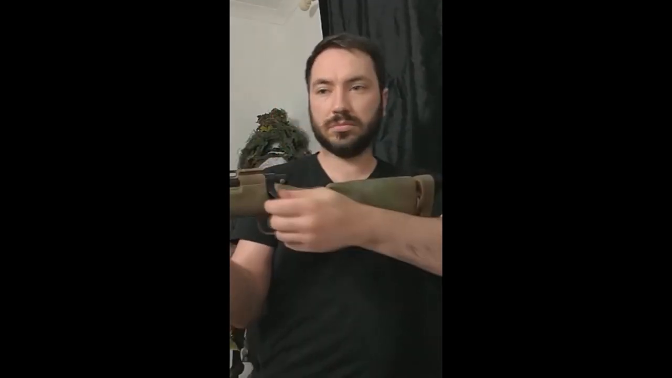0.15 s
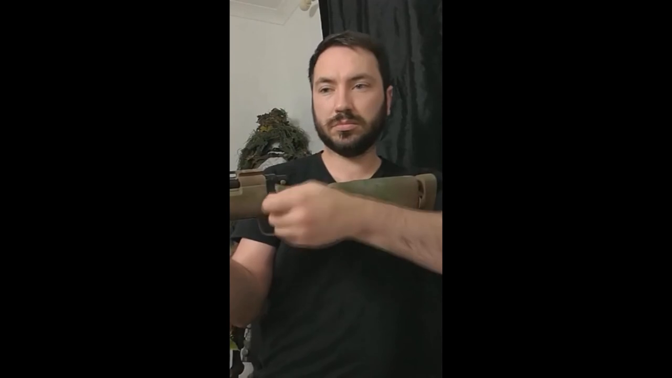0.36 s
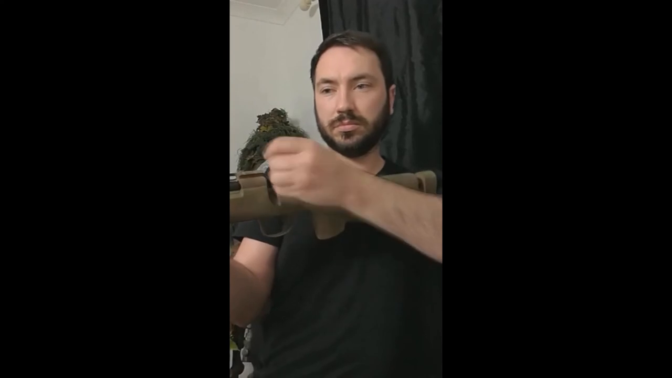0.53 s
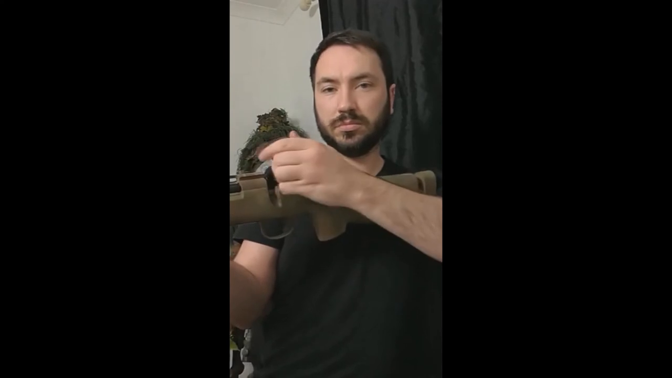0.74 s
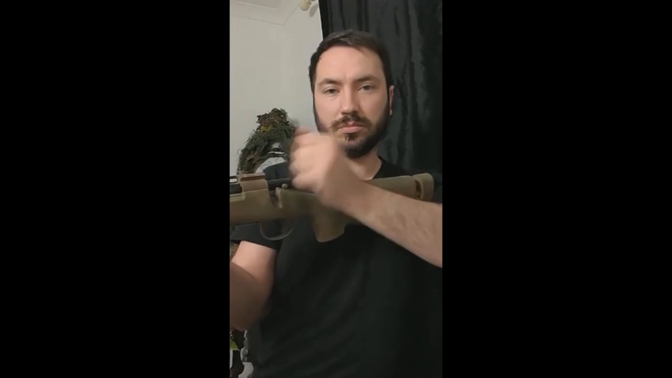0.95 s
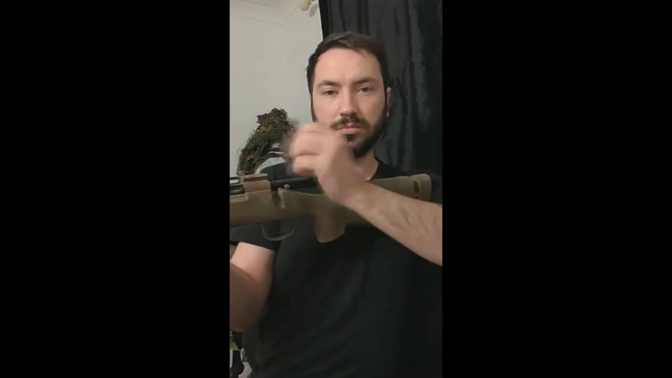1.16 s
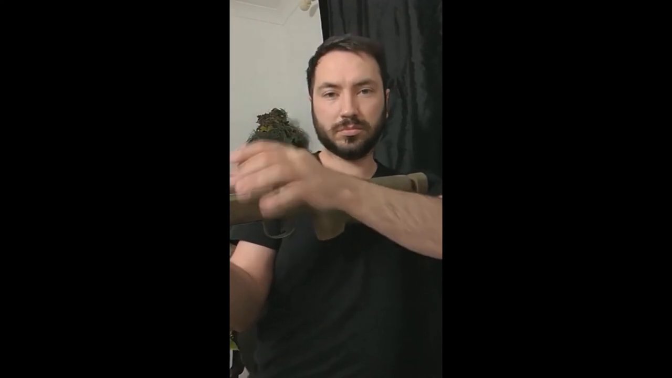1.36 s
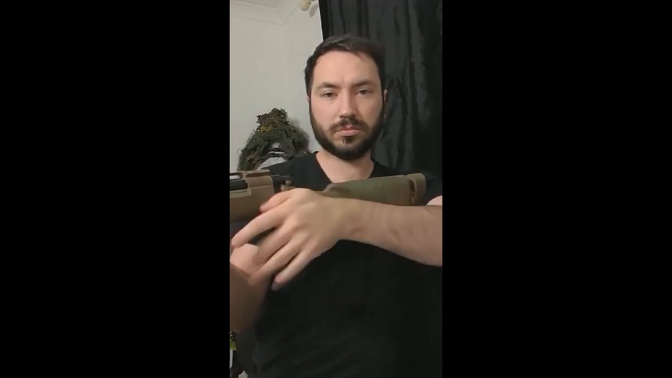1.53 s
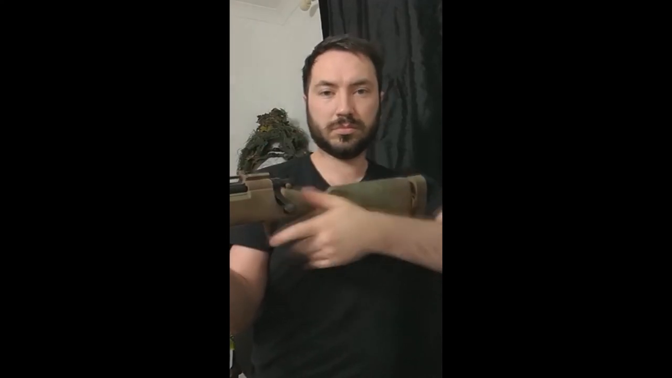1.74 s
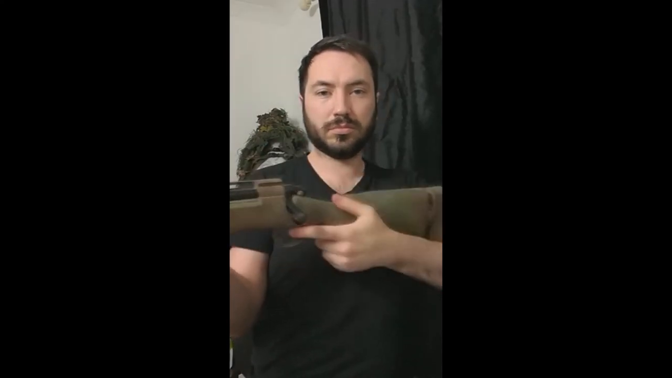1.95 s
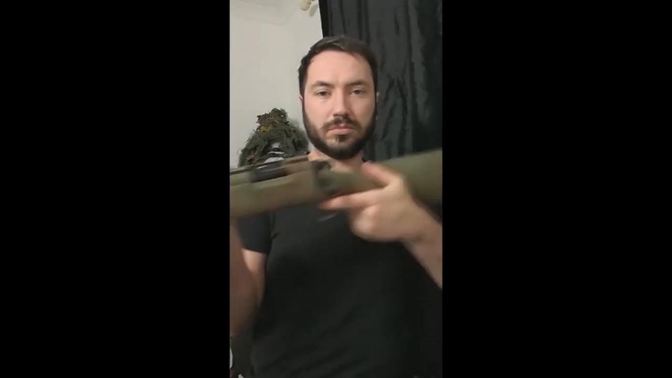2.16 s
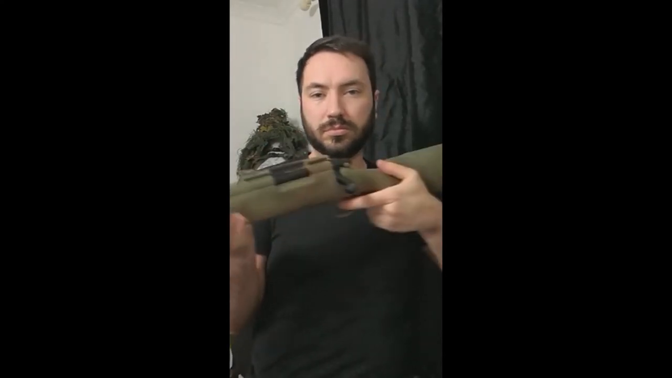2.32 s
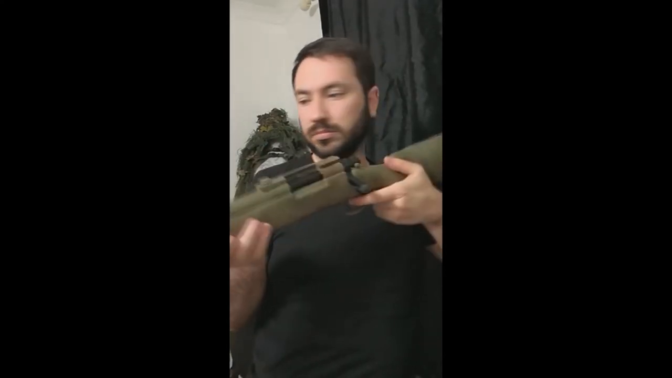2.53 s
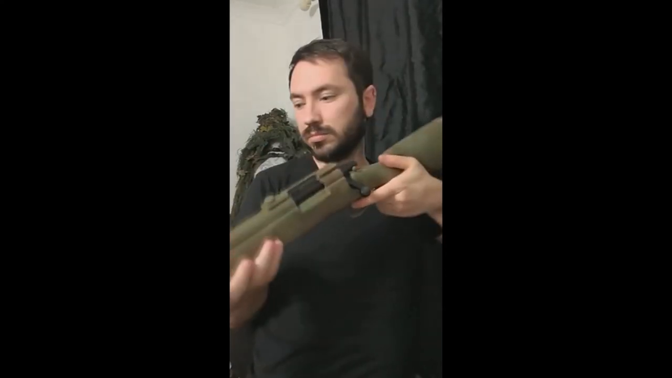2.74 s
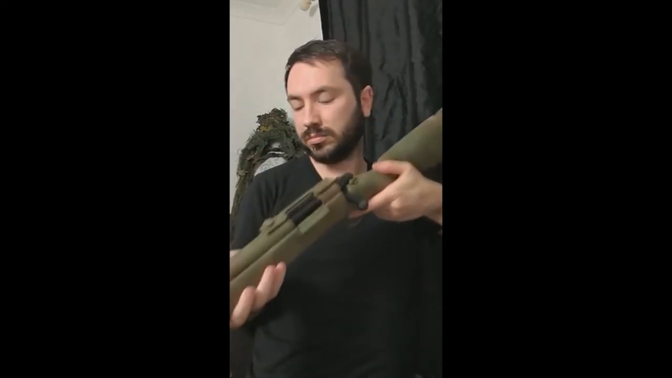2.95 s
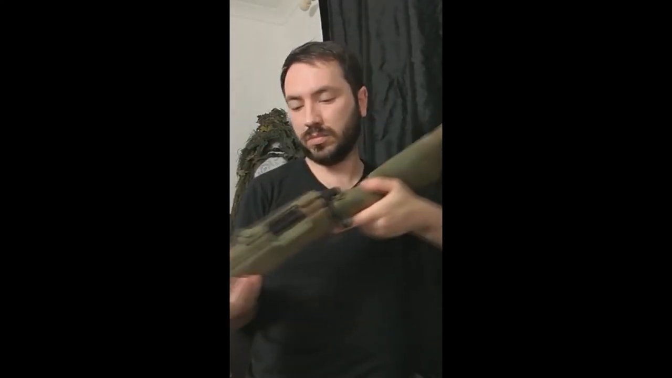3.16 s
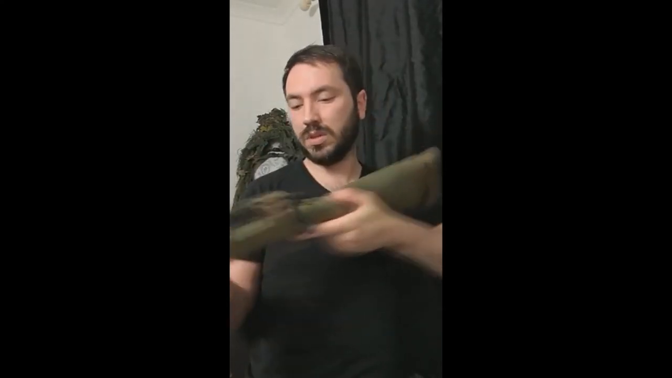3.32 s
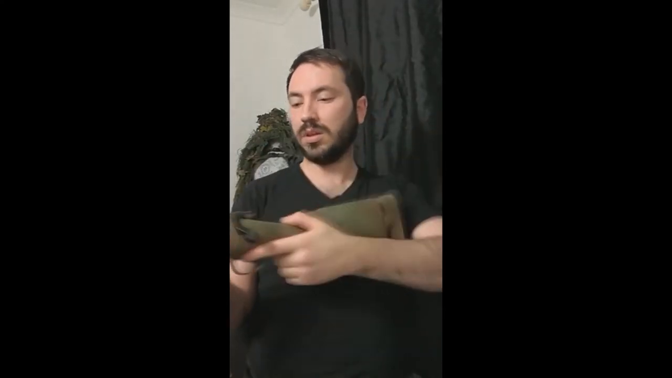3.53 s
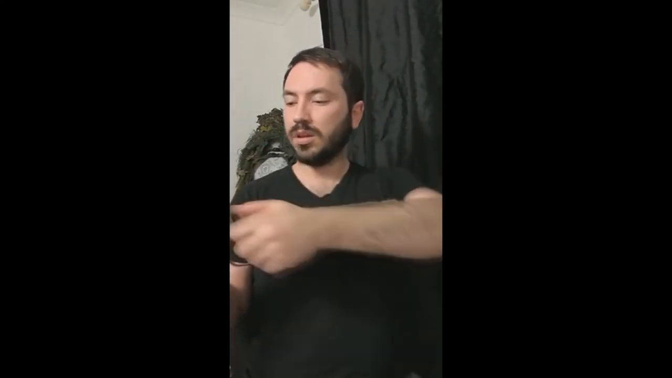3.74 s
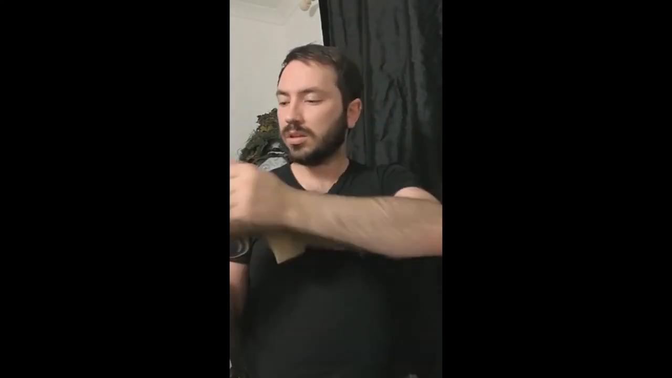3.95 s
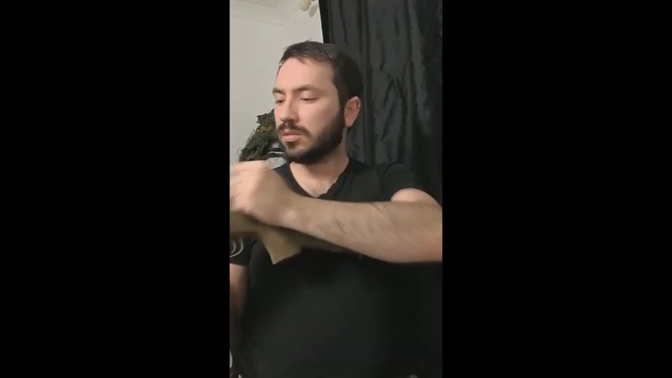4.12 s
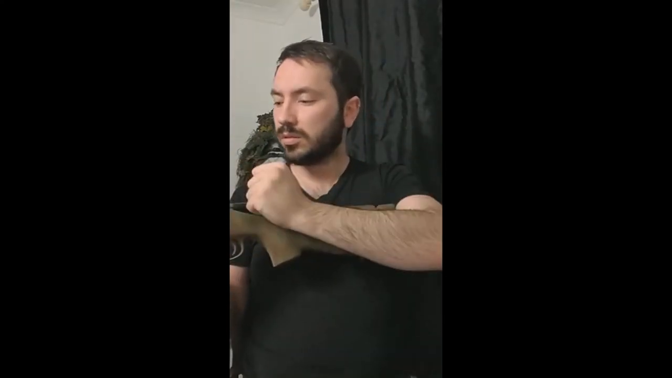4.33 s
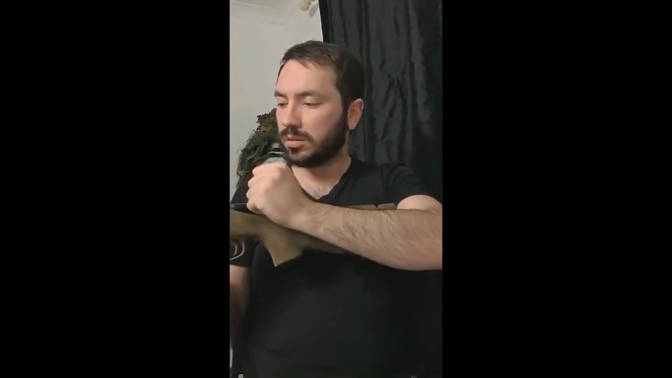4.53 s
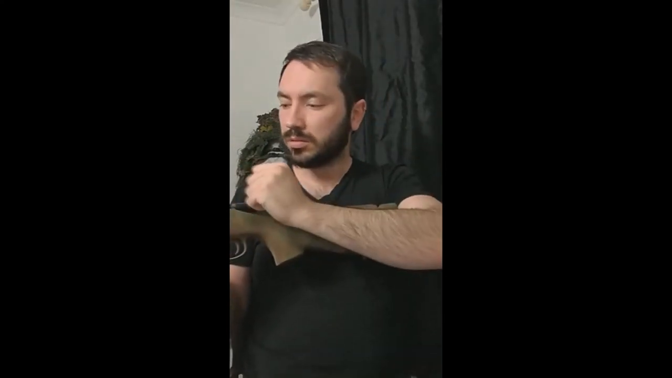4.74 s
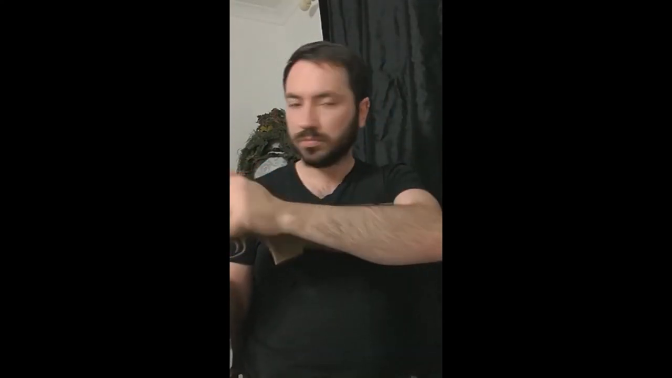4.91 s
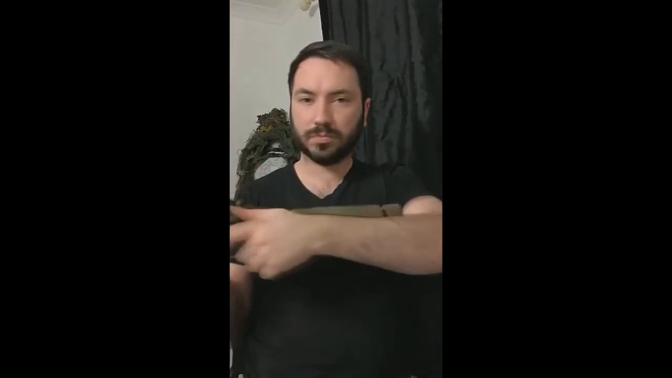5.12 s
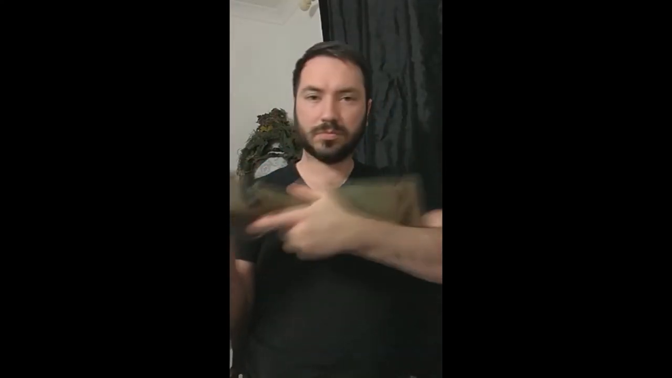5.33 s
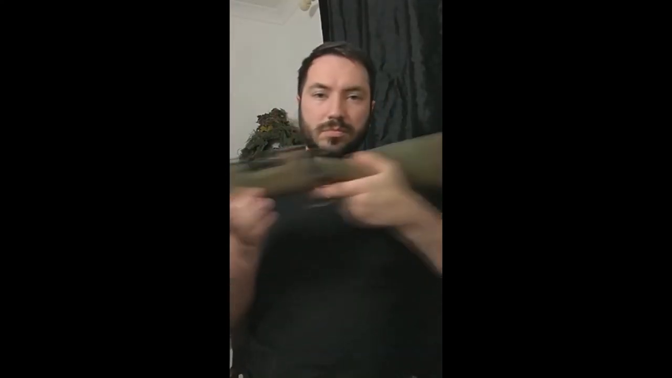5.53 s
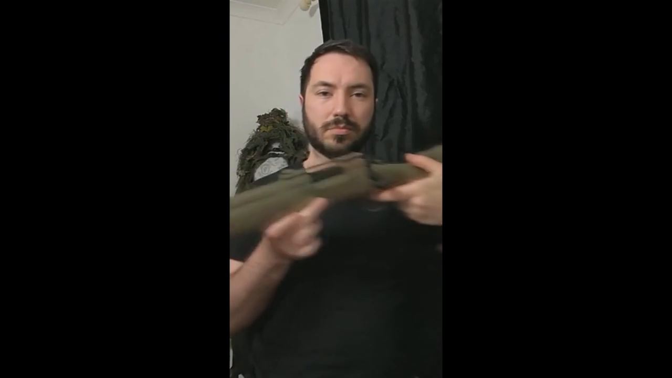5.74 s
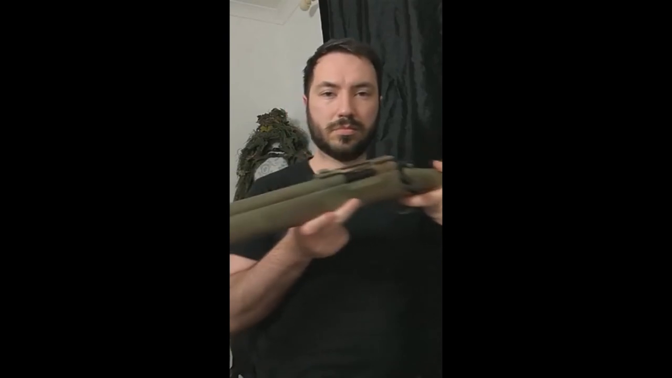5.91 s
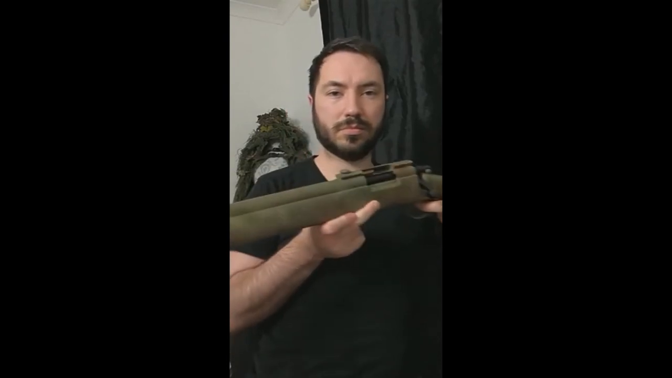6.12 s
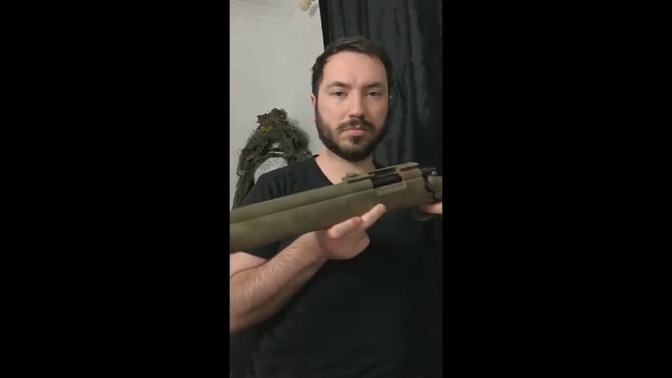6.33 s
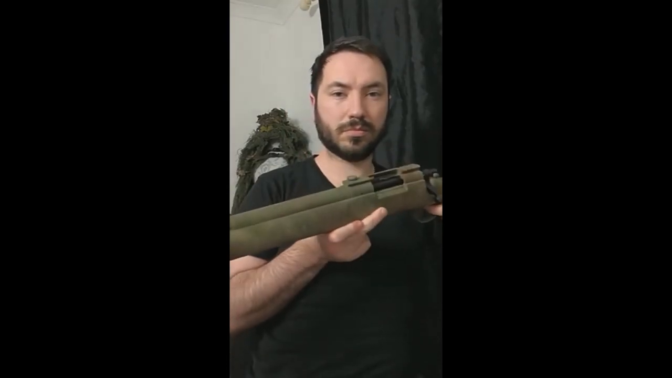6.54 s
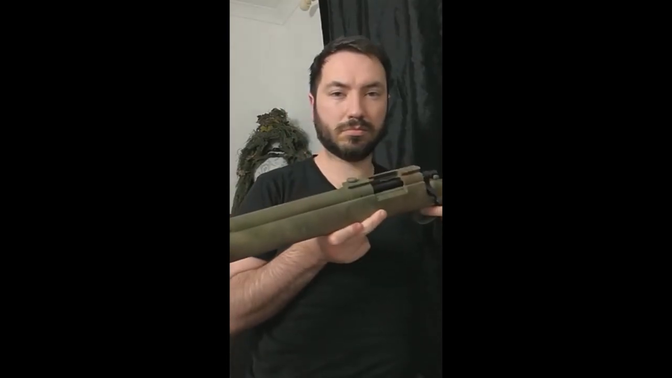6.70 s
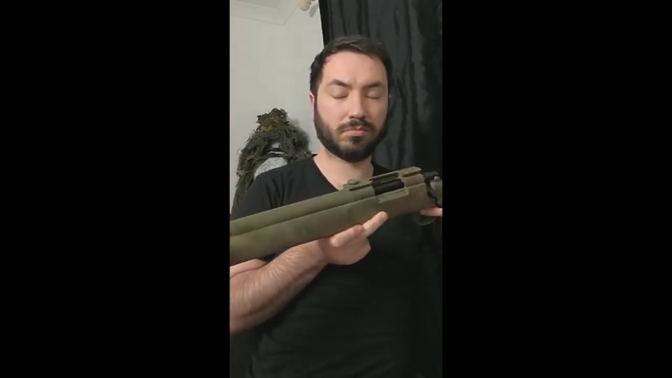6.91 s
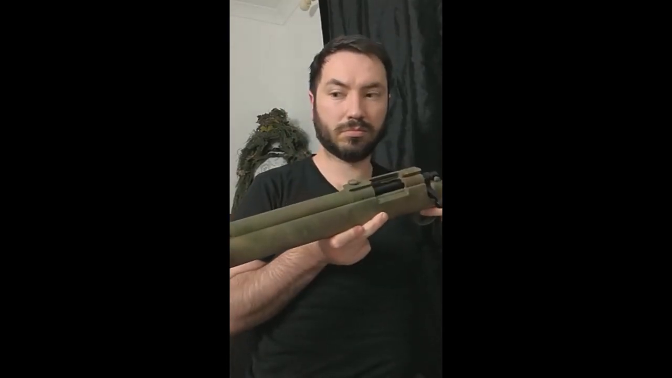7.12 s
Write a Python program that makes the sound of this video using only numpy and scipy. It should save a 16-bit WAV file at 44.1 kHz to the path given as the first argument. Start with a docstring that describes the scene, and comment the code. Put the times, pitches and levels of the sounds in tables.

```python
"""Air rifle, cocked and fired

A spring air rifle is handled in a small furnished room, close to a phone microphone. Its bolt is lifted,
drawn, pushed home and locked twice: noise chatter and sliding grit drive the ringing modes of metal and stock.
Hands and sleeves rub the plastic in swells of grainy noise, over low rumble, room tone and a thin whine.
At the end it fires: a piston slam through resonances, a burst of shaped noise for the air, a late clatter."""
import sys
import numpy as np
from scipy import signal
from scipy.fft import rfft, irfft, next_fast_len
from scipy.io import wavfile

SR = 44100
rng = np.random.default_rng(int(sys.argv[2]) if len(sys.argv) > 2 else 0)


def waveform_to_disk(signal):
    """Save audio, clipped to [-1, 1], as 16-bit WAV at the path in sys.argv[1]."""
    frames = np.transpose(np.atleast_2d(signal))
    scaled = np.clip(frames, -1, 1) * 32767
    samples = np.round(scaled).astype(np.int16)
    wavfile.write(sys.argv[1], SR, samples)


N = 316197   # length in samples

# All levels are relative: layer trims, the room and the microphone chain follow.
# steady room tone, spectrum: f/Hz, level/dB
AIR_SPECTRUM = [(12, -38), (20, -14.5), (93, -11.5), (386, 1), (443, -11), (508, 0.5), (599, -10.5),
                (706, -1), (850, -4.5), (1160, -12.5), (1520, -15.5), (5360, -19.5), (9000, -18.5),
                (14000, -21)]
AIR_DB = -63.5
WHINE_HZ, WHINE_DB = 8280, -73.5   # a thin steady electrical whine

# hands and sleeves on the stock, one swell a row:
# peak t/s, rise t/s, fall t/s, palm drag level/dB, hollow ring level/dB, scuff level/dB, sleeve rustle level/dB
HAND_SWELLS = [(0.0,.05,0.39,-63,-79,-84,-65.5), (.27,0.045,.1,-49,-59,-80,-80),
               (.46,0.26,0.18,-61,-84,-94,-93), (.79,0.04,0.095,-57,-79,-82,-70),
               (.966,0.01,0.17,-61.5,-56.5,-78,-77), (1.754,0.054,0.09,-67,-83,-72,-52.5),
               (1.938,0.33,0.088,-62.5,-61.5,-60,-55), (2.142,0.052,0.11,-71,-56,-62.5,-59.5),
               (2.22,.1,0.17,-70,-54,-63.5,-60.5), (2.535,0.033,0.1,-66,-63,-59,-75),
               (3.184,0.066,.08,-77,-78,-68,-71), (3.446,0.11,0.16,-51.5,-46.5,-60,-57),
               (3.51,0.16,0.19,-58,-57,-50.5,-45), (3.72,0.24,0.49,-54,-79,-58.5,-60),
               (3.914,0.025,0.078,-53,-78,-76,-78), (5.22,0.046,0.059,-66,-45,-64.5,-65),
               (5.342,0.42,.12,-68,-87,-62,-56.5), (5.452,0.058,0.13,-58,-63,-66,-70),
               (5.49,.06,0.13,-66,-70,-62,-61), (5.81,.18,0.1,-62,-60.5,-69,-62),
               (5.88,0.09,0.12,-52.5,-56.5,-56,-56.5), (5.958,.03,.12,-53,-53.5,-60,-62),
               (6.15,.08,0.048,-65,-86,-87,-79), (6.2,0.042,0.057,-64,-70,-87,-77),
               (6.917,.008,0.17,-38,-39.5,-69,-58), (6.937,0.029,0.11,-47,-48,-51.5,-44)]
# palm drag on plastic, then scuff and sleeve cloth (each its own band of it), spectra: f/Hz, level/dB
RUB_SPECTRUM = [(110, -41), (180, -9.5), (259, -1), (527, -1.5), (618, -8.5), (758, -7), (963, -15.5),
                (1500, -14), (1950, -41.5), (3300, -120)]
RUSTLE_SPECTRUM = [(1290, -18.5), (2200, -19), (2530, -1.5), (3900, -1.5), (5440, -5.5), (6110, -2),
                   (10500, -1), (14000, -4.5)]
# long ring of the hollow stock, then its upper rings: f/Hz, width f/Hz, level/dB
HOLLOW_MODES = [(770, 39, 2.5)]
STOCK_MODES = [(1815, 200, 9.5), (2050, 130, 1)]
RING_DB = -3   # upper stock rings re the geometric mean of drag and scuff
SWELL_DB = 28.5   # drop of a swell one rise before its peak or one fall after it

# low rumble that comes with shifts of weight and hard blows:
# peak t/s, rise t/s, fall t/s, hum level/dB, deep level/dB
RUMBLE_SWELLS = [(.3, 0.072, 0.34, -56, -72), (.42, .25, 0.88, -63, -63.5), (.68, 0.33, 0.099, -61, -67),
                 (.84, 0.088, 0.034, -53, -71), (.95, 0.044, 0.033, -58, -67),
                 (1.09, 0.36, 0.28, -73.5, -76), (1.45, 0.17, 0.28, -59, -65),
                 (1.63, .15, 0.21, -55, -60.5), (2.2, 0.21, 0.43, -91, -75), (3.66, 0.12, 0.43, -69, -69),
                 (4.0, 0.16, 0.078, -62, -62), (4.09, .06, 0.18, -53.5, -69),
                 (4.27, .25, 0.049, -57, -84.5), (4.97, 0.11, .3, -59.5, -64), (5.15, 0.2, .13, -52, -64),
                 (5.63, 0.26, .08, -76, -79), (5.88, 0.17, .3, -73, -98), (6.565, 0.0077, 0.25, -32, -35),
                 (6.622, 0.034, 0.074, -36.5, -28), (6.712, .1, 0.059, -39, -55),
                 (6.942, 0.06, 0.19, -47.5, -67.5)]
RUMBLE_HZ, RUMBLE_WIDTH_HZ = 144.2, 33   # each of two resonances in series
HUM_REST_DB, DEEP_REST_DB = -79.5, -80.5

# bolt and catch contacts:
# t/s, peak level/dB, heaviness level/dB, sharpness level/dB, pitch the struck spot favours f/Hz, ring level/dB
CONTACTS = [(.262,-58,3,-7,1270,4), (.527,-23.5,5,5.5,2050,7), (.557,-17,0.5,-3.5,565,18),
            (.599,-29,6,0,565,6), (.624,-17,8.5,-1,565,-5), (.65,-18,9.5,1.5,565,13),
            (.657,-7,0,-0.5,1890,5), (.969,-44,-8,-6,1780,5.5), (1.035,-14.5,-12,14,6400,8.5),
            (1.042,-17.5,1,-4,2050,8), (1.066,-0.5,-14,5.5,3150,2.5), (1.105,-13,-5,-11.5,1780,6.5),
            (1.111,-13.5,-3.5,9.5,1780,5), (1.149,-20.5,9.5,3,1780,8.5), (1.169,-20.5,4.5,-0.5,2050,6.5),
            (1.26,-28,11,-6.5,2050,1.5), (1.267,-23,5,-2.5,1780,10), (1.291,-25.5,6,4,1780,-1),
            (1.308,-24.5,1.5,-2,565,7), (1.34,-32,6,6,3150,1.5), (1.345,-21,6.5,-1,565,6.5),
            (1.372,-23,2.5,-6,1900,3), (1.384,-3.5,-1,4,4600,2), (1.448,-4.5,-17,4,7700,-12),
            (1.454,-5.5,-0.5,6,785,2), (1.547,-28,7,-4,565,2), (1.588,-26,11.5,-1,1270,13),
            (1.609,-13.5,5,0,752,9.5), (2.135,-41.5,-4,5,810,7.5), (2.188,-39,0,3,3150,-4),
            (2.214,-43.5,-4,-5,810,20), (2.267,-43,-6,7,6400,12), (2.334,-44,9,6,3150,0),
            (2.532,-44.5,3.5,-9,1270,6), (3.349,-46,-1,-5,2050,-1), (3.386,-41,-4,4,6400,6),
            (3.649,-34.5,-15,3,8500,15), (3.917,-47,0.5,-13.5,1800,8), (3.997,-19,-7,3,6600,7),
            (4.013,-22.5,2,-2.5,1900,5.5), (4.03,-30,-3,2.5,3800,3.5), (4.04,-17.5,-6,7,7500,5),
            (4.06,-7,-1.5,4.5,1270,3.5), (4.079,5,-4,0,810,4), (4.109,-18,-0.5,-3,2000,10),
            (4.197,-22.5,-10.5,8,7600,7.5), (4.224,-13,-3.5,-2,1780,8), (4.236,-2,-10,6,6400,7.5),
            (4.94,-16,4,2.5,3225,12.5), (4.947,-14.5,-9,-7,784,5), (4.961,-7.5,-7,0.5,1900,-7),
            (4.965,-2,-6.5,5.5,800,-1), (5.006,-3.5,-2.5,5,3600,10.5), (5.071,-18.5,-11,-1,1800,9),
            (5.102,-17,8,-1,787,15.5), (5.117,-3.5,2,2,1200,7.5), (5.446,-48,4,-18.5,1785,4),
            (5.952,-38,-10,0.5,790,8), (6.935,-36,3,19.5,8600,0)]
# bolt strokes, scraping up to a stop: start t/s, length t/s, start level/dB, end level/dB
SLIDES = [(0.519, 0.042, -52, -35.5), (0.627, 0.022, -74, -32.5), (1.029, 0.039, -38.5, -30),
          (1.085, 0.023, -37.5, -37.5), (1.243, 0.15, -44.5, -42.5), (1.4, 0.07, -35, -25),
          (3.993, 0.039, -47.5, -44), (4.051, 0.02, -29, -15.5), (4.072, 0.012, -30, -34.5),
          (4.198, 0.039, -40.5, -23.5), (4.876, 0.071, -71, -22.5), (4.984, 0.028, -35, -21),
          (5.083, 0.038, -40, -21.5)]
# broad modes of bolt and stock, then narrow rings of stock and metal parts: f/Hz, width f/Hz, level/dB
RIFLE_MODES = [(572, 140, 2), (1160, 16, 2.5), (1570, 150, -10.5), (1923, 260, 0.5), (3105, 170, -3),
               (4500, 560, -14), (7456, 1100, -8.5), (8500, 1400, -9), (12670, 2700, -13.5)]
METAL_MODES = [(565, 24, -2), (800.7, 13, 9.5), (1280, 18, 3.5), (1780, 40, 2), (1900, 16, 1.5),
               (2064, 69, 0.5), (3150, 250, -4.5), (3600, 40, -0.5), (4600, 100, -3), (5500, 60, -2),
               (6000, 50, -2), (7460, 80, 0), (8600, 74, -1.5)]
CONTACT_MS, THUD_MS, TICK_MS = 3.92, 6.9, 3.2   # decay time constants
THUD_DB, KNOCK_DB, CLICK_DB, TICK_DB = -7, -0.5, -4.5, -6   # layer trims re the peak column
MODES_DB, CRACK_DB = -1.5, -4
FAVOUR_DB_OCT = 40.5   # a ring weakens with its distance from the favoured pitch
SLIDE_TAIL_S, SLIDE_TAIL_DB = 40 / 377.5, 40.5   # length and drop of the fade after each stroke

# reverberation time: f/Hz, t/s
ROOM_T60 = [(60, 0.31), (300, 0.27), (1000, .27), (3000, 0.23), (7000, 0.23), (14000, 0.16)]
ROOM_DB = -5

# shot: t/s, air blast level/dB, low push level/dB
SHOT_LEVELS = [(6.552, -40, -56), (6.556, -34, -41), (6.558, -10, -25.5), (6.562, -8.5, -13),
               (6.598, -19, -27), (6.606, -4.5, -22.5), (6.658, -11, -27.5), (6.792, -57.5, -64),
               (6.89, -55, -78), (6.91, -62, -61.5)]
# piston and spring: t/s, level/dB, contact t/ms
SLAMS = [(6.557, -6, 2.4), (6.566, 18.5, 3.1), (6.603, -15.5, 2.5)]
# cylinder resonances: f/Hz, width f/Hz, level/dB
CYLINDER_MODES = [(1256, 73, 5.5), (485, 117, -5), (3650, 300, -27.5)]
# air blast and low push, spectra: f/Hz, level/dB
BLAST_SPECTRUM = [(530, -22.5), (900, -27.5), (1620, -10.5), (1880, -6), (3110, -2), (5650, -5),
                  (8350, -4.5), (13100, -12), (14000, -27)]
PUSH_SPECTRUM = [(12, -25.5), (20, -7.5), (362, -2.5), (408, -3.5), (492, -0.5), (1030, -7.5), (1200, -9.5),
                 (1560, -29.5), (2640, -120)]

# a thin bright double clatter after the shot: t/s, level/dB
CLATTER_LEVELS = [(7.064, -79.5), (7.068, -22), (7.075, -15), (7.1, -22), (7.127, -27), (7.132, -27),
                  (7.15, -28), (7.17, -25)]
# its spectrum: f/Hz, level/dB
CLATTER_SPECTRUM = [(180, -30), (300, -14), (401, -17), (599, -12), (726, -26), (787, -10.5), (1020, -22),
                    (1320, -2.5), (2000, 0.5), (2550, -3), (6790, -4), (8920, -7), (14000, -16)]
# its ringing burst: t/s, level/dB, contact t/ms
CLATTER_BURST = [(7.129, -4.5, 26)]
# resonances of that burst: f/Hz, width f/Hz, level/dB
CLATTER_MODES = [(1630, 29, 6), (2990, 110, -1), (5630, 120, -3), (8660, 1100, -2), (9700, 800, -8)]

LIMIT_DB, RELEASE_DB_S = -13.5, 29   # gain control threshold, recovery of the detected level
SQUEEZE = 0.56   # dB of ducking per dB over the threshold
MIC_TOP_HZ, CUTOFF_HZ = 14500, 15400   # stop-band edges of the two low-passes


def from_db(db):
    """dB to gain."""
    return 10 ** (np.asarray(db) / 20)


def rms_one(x):
    """Scale to rms 1."""
    return x / np.sqrt(np.mean(x ** 2) + 1e-20)


def gains(tables):
    """Sum level curves as gains in time, silent outside their spans."""
    t, out = np.arange(N) / SR, 0
    for rows in tables:
        s, *columns = np.transpose(rows)
        curves_db = [np.interp(t, s, c, left=-200, right=-200) for c in columns]
        out = out + from_db(curves_db)
    return out


def swells(rows):
    """Each row swells to its peak and dies away; overlaps add in power, one gain in time per level column."""
    t, power = np.arange(N) / SR, np.zeros((len(rows[0]) - 3, N))
    for peak, rise, fall, *levels_db in rows:
        near = slice(max(int((peak - 2 * rise) * SR), 0), int((peak + 2 * fall) * SR))
        shape_db = -SWELL_DB * np.maximum((peak - t[near]) / rise, (t[near] - peak) / fall)
        power[:, near] += np.outer(from_db(levels_db), from_db(shape_db)) ** 2
    return np.sqrt(power)


def at_hz(points, hz):
    """Read a table on a log-frequency axis."""
    table_hz, values = np.transpose(points)
    return np.interp(np.log(hz), np.log(table_hz), values)


def coloured(spectrum):
    """Noise with this spectrum, rms 1."""
    size = next_fast_len(N)
    hz = np.arange(size // 2 + 1) * SR / size + 1
    white = rfft(rng.standard_normal(size))
    return rms_one(irfft(white * from_db(at_hz(spectrum, hz)), size)[:N])


def band(x, low_hz, high_hz):
    """Gentle causal band-pass."""
    sos = signal.butter(2, [low_hz, min(high_hz, .45 * SR)], "band", fs=SR, output="sos")
    return signal.sosfilt(sos, x)


def gritty(spectrum, spread_db):
    """Coloured noise whose level jumps from grain to grain by spread_db rms."""
    grain = from_db(spread_db * rms_one(band(rng.standard_normal(N), 14, 276)))
    return rms_one(grain) * coloured(spectrum)


def body(x, modes):
    """Parallel resonances, each a peak of its own width."""
    out = 0
    for hz, width, level_db in modes:
        r = np.exp(-np.pi * width / SR)   # a wider peak dies sooner
        b = (1 - r * r) / 2 * np.array([1, 0, -1])
        a = [1, -2 * r * np.cos(2 * np.pi * hz / SR), r * r]
        out = out + from_db(level_db) * signal.lfilter(b, a, x)
    return out


def bursts(times, levels_db, contact_ms, rise_ms=0.58):
    """Row 0: each contact as a short chatter of noise; row 1: the same expected energy as one even click."""
    length = 4000
    out = np.full((2, N + length), 1e-18)
    t_ms = np.arange(length) / SR * 1000
    noise = rng.standard_normal((len(times), length))
    for s, level_db, ms, chatter in zip(times, levels_db, contact_ms, noise):
        i = round(s * SR)
        shape = from_db(level_db) * (1 - np.exp(-t_ms / rise_ms)) * np.exp(-t_ms / max(ms, .3))
        out[0, i:i + length] += chatter * shape
        out[1, i] += np.sign(chatter[0]) * np.sqrt(np.sum(shape ** 2))
    return out[:, :N]


def room_tone():
    """Steady coloured noise: the air of the room."""
    return from_db(AIR_DB) * coloured(AIR_SPECTRUM)


def whine():
    """One steady sine, the electrical whine; the root of 2 makes its level rms."""
    return from_db(WHINE_DB) * 2 ** .5 * np.sin(2 * np.pi * WHINE_HZ * np.arange(N) / SR)


def hands():
    """Skin and cloth drag over the plastic; the hollow stock colours the rub."""
    drag, hollow, scuff, rustle = swells(HAND_SWELLS)
    white = rng.standard_normal(N)
    upper = from_db(RING_DB) * np.sqrt(drag * scuff)
    stock = hollow * rms_one(body(white, HOLLOW_MODES)) + upper * rms_one(body(white, STOCK_MODES))
    scuffing = rms_one(band(gritty(RUSTLE_SPECTRUM, 2.5), 2300, 6500))
    rustling = rms_one(band(gritty(RUSTLE_SPECTRUM, 1.5), 5500, 15000))
    return drag * gritty(RUB_SPECTRUM, 2.7) + stock + scuff * scuffing + rustle * rustling


def rumble():
    """A low hollow resonance and deeper thumps over a quiet rest level."""
    hum, deep = swells(RUMBLE_SWELLS) + from_db([[HUM_REST_DB], [DEEP_REST_DB]])
    mode = [(RUMBLE_HZ, RUMBLE_WIDTH_HZ, 0)]
    white = rng.standard_normal((2, N))
    humming = rms_one(body(body(white[0], mode), mode))
    return hum * humming + deep * rms_one(band(white[1], 22, 90))


def sliding():
    """The bolt scrapes along its way: sparse strong grains, cut off by a quick fade at the stop."""
    grit = rng.standard_normal(N) * from_db(5.0 * np.minimum(rng.exponential(1, N), 5))
    strokes = []
    for start, length, start_db, end_db in SLIDES:
        stop = start + length
        tail = (stop + SLIDE_TAIL_S, end_db - SLIDE_TAIL_DB)
        strokes.append([(start, start_db), (stop, end_db), tail])
    return gains(strokes)[0] * band(rms_one(grit), 220, 7800)


def metal_rings(s, level_db, spot_hz, ms):
    """Each click rings the narrow modes, most strongly those near the pitch its struck spot favours."""
    out = 0
    for mode in METAL_MODES:
        octaves_away = np.abs(np.log2(spot_hz / mode[0]))
        clicks = bursts(s, level_db - FAVOUR_DB_OCT * octaves_away, ms)[1]
        out = out + body(clicks, [mode])
    return out


def bolt():
    """Contacts and sliding grit shake the rifle: a bare crack plus its ringing modes (rows as in bursts)."""
    s, peak_db, heavy_db, sharp_db, spot_hz, ring_db = np.transpose(CONTACTS)
    ms = np.full(len(s), CONTACT_MS)
    thud_ms, tick_ms = np.full(len(s), THUD_MS), np.full(len(s), TICK_MS)
    # heavy contacts move the stock; sharp ones trade knock for tick
    thud = band(bursts(s, peak_db + heavy_db + THUD_DB, thud_ms), 260, 1000)
    knock = band(bursts(s, peak_db - sharp_db + KNOCK_DB, ms), 900, 2500)
    click = band(bursts(s, peak_db + CLICK_DB, ms), 1900, 7000)
    tick = band(bursts(s, peak_db + sharp_db + TICK_DB, tick_ms), 7000, 13000)
    rings = metal_rings(s, peak_db + ring_db, spot_hz, ms)
    shake = thud + knock + click + tick + sliding()
    return from_db(CRACK_DB) * shake + from_db(MODES_DB) * body(shake, RIFLE_MODES) + rings


def room(x):
    """Diffuse tail: half-octave bands of noise, each dying at its own rate, after a short gap."""
    t, edges = np.arange(SR // 2) / SR, 40 * 2 ** np.arange(0, 9, .5)
    white, tail = rng.standard_normal((2, len(t))), 0   # neighbouring bands get unrelated noise
    for k, (low, high) in enumerate(zip(edges, edges[1:])):
        fall_db = -60 * t / at_hz(ROOM_T60, np.sqrt(low * high))
        tail = tail + band(white[k % 2], low, high) * from_db(fall_db)
    tail = tail * np.clip((t - .003) / 0.0032, 0, 1)   # 3 ms gap, then a fade-in
    return signal.fftconvolve(x, tail / np.sqrt(np.sum(tail ** 2)))[:N]


def shot():
    """The piston slams into the cylinder head and the air rushes out of the barrel."""
    s, level_db, ms = np.transpose(SLAMS)
    blast, push = gains([SHOT_LEVELS])
    slam = body(bursts(s, level_db, ms)[1], CYLINDER_MODES)
    return slam + blast * coloured(BLAST_SPECTRUM) + push * coloured(PUSH_SPECTRUM)


def clatter():
    """Thin, bright rattling of grainy noise; in its second part a burst of chatter rings resonances."""
    s, level_db, ms = np.transpose(CLATTER_BURST)
    rattle = gains([CLATTER_LEVELS])[0] * gritty(CLATTER_SPECTRUM, 1.4)
    return rattle + body(bursts(s, level_db, ms)[0], CLATTER_MODES)


def scene():
    """The microphone hears each contact's own chatter; the walls gather all directions, an even spectrum."""
    direct, radiated = bolt() + shot()
    near = hands() + rumble() + clatter()
    walls = from_db(ROOM_DB) * room(radiated)
    return (direct + walls + near + room_tone() + whine())[None]


def record(dry):
    """Gain control ducks on sustained loudness and recovers slowly; peaks clip softly; the top is cut."""
    slow = np.exp(-1 / (0.045 * SR))   # 45 ms loudness averaging
    power = signal.lfilter([1 - slow], [1, -slow], dry[0] ** 2)
    level_db = 10 * np.log10(power + 1e-12)
    # hold the highest level so far, sinking at the release rate
    ramp = RELEASE_DB_S * np.arange(N) / SR
    held_db = np.maximum.accumulate(level_db - LIMIT_DB + ramp) - ramp
    x = dry * from_db(-SQUEEZE * np.maximum(held_db, 0))
    x = signal.sosfilt(signal.cheby2(14, 28, MIC_TOP_HZ, fs=SR, output="sos"), x)
    x = x / (1 + np.abs(x / .93) ** 4) ** .25   # soft ceiling at 0.93
    return signal.sosfilt(signal.cheby2(14, 80, CUTOFF_HZ, fs=SR, output="sos"), x)


dry = scene()
out = record(dry)
waveform_to_disk(out)
```